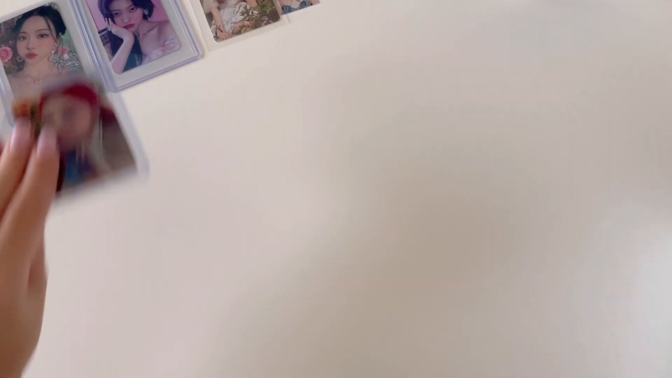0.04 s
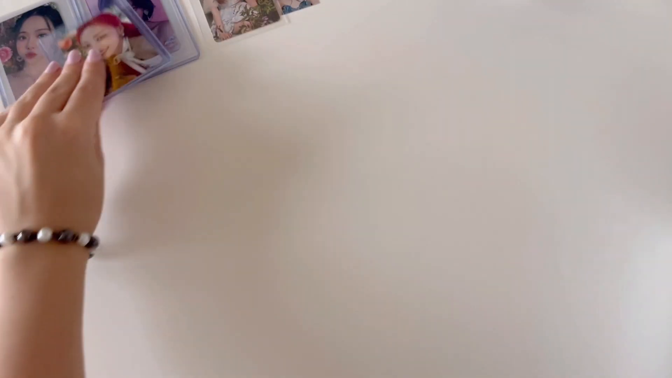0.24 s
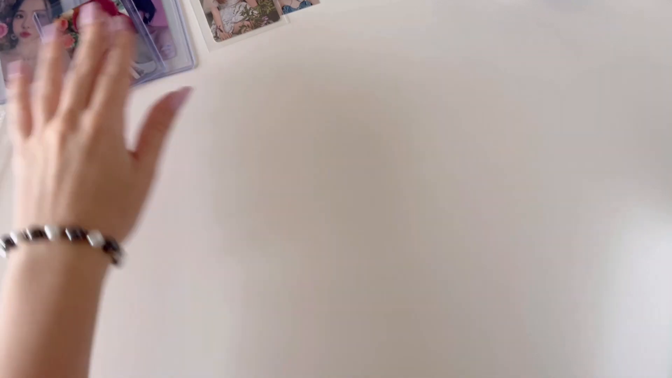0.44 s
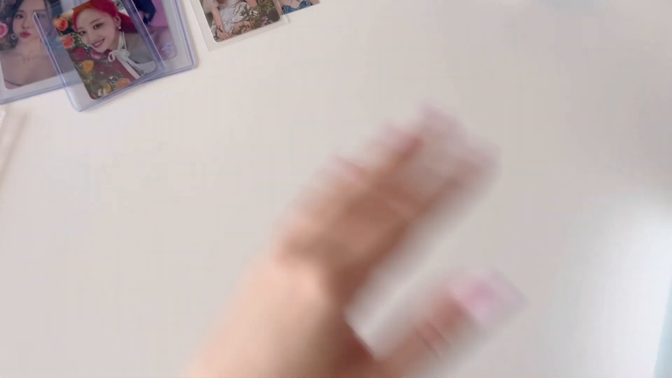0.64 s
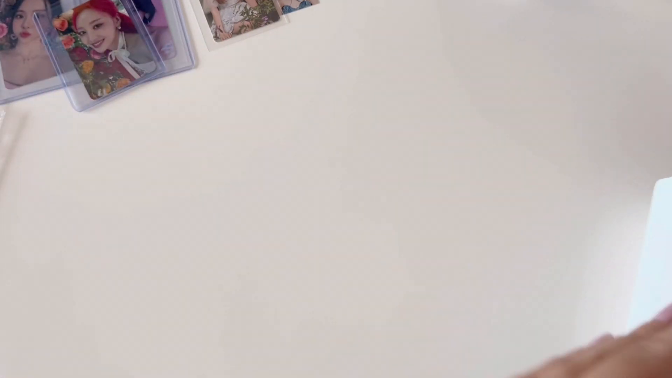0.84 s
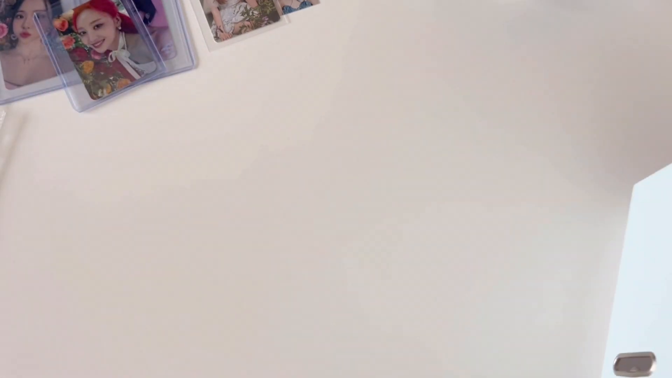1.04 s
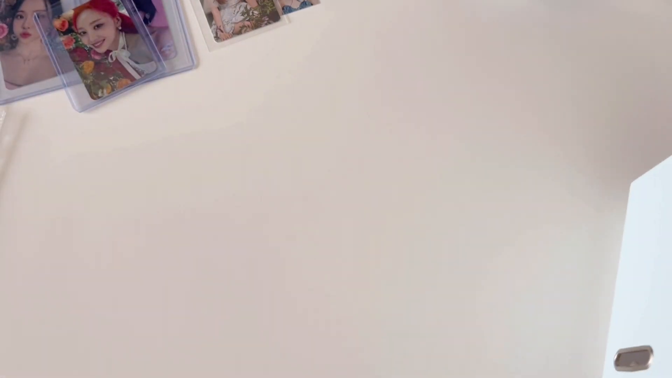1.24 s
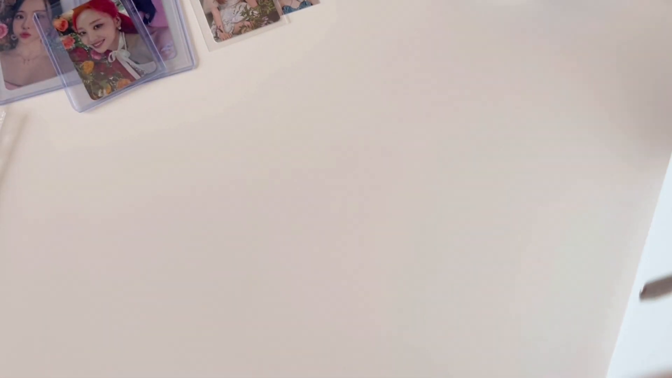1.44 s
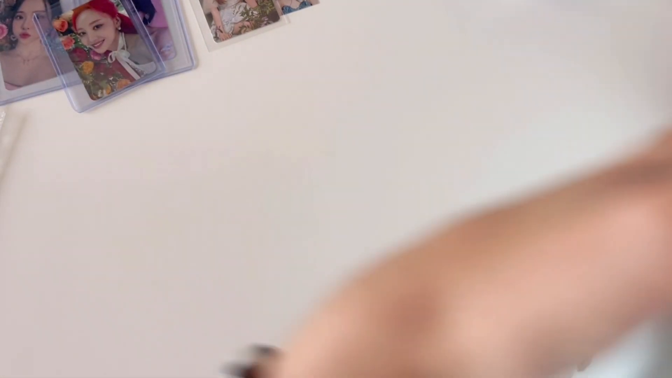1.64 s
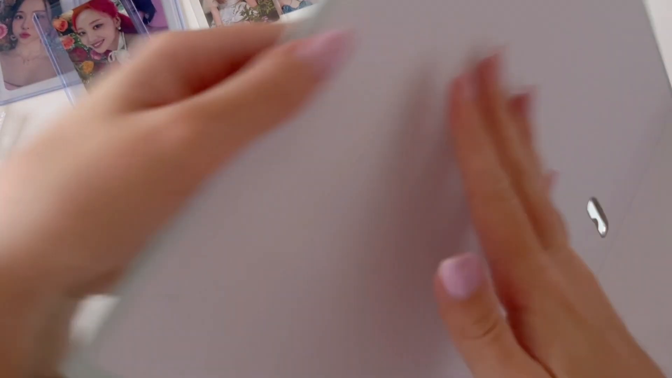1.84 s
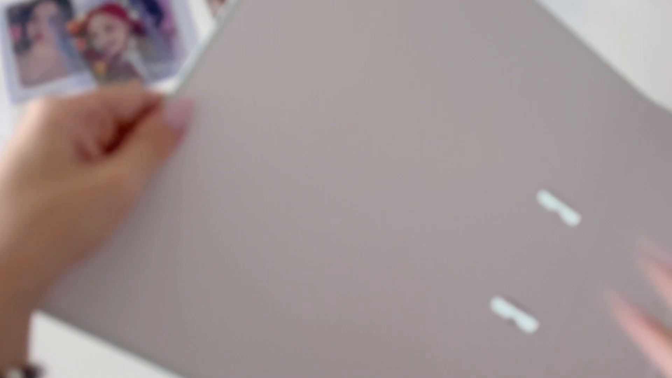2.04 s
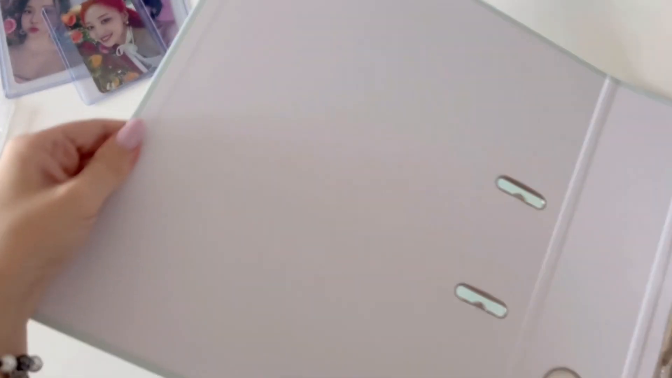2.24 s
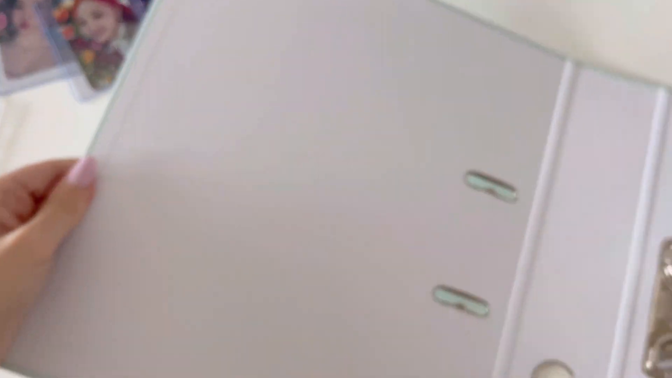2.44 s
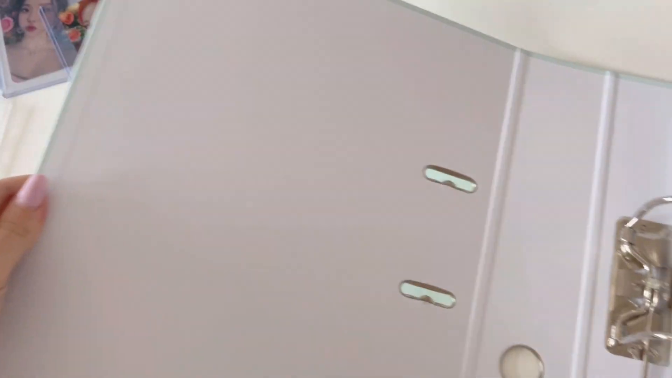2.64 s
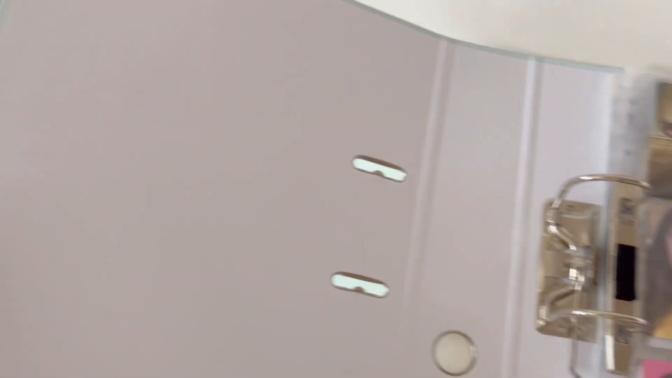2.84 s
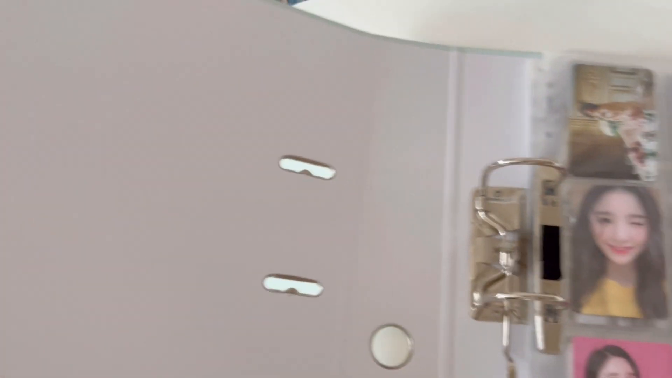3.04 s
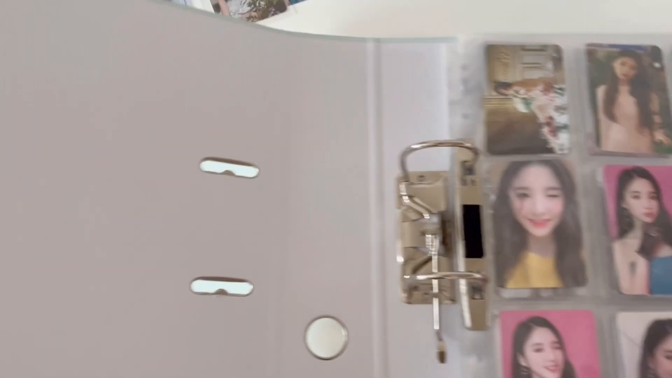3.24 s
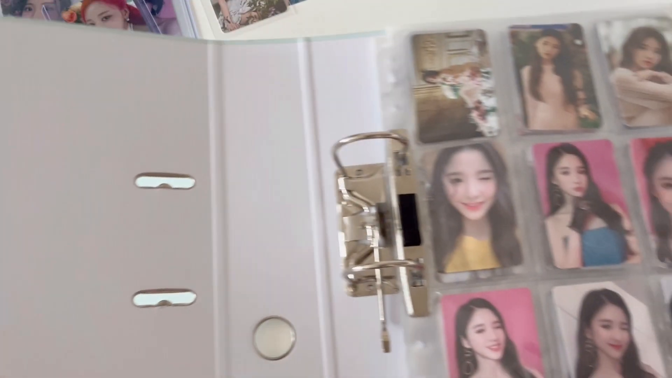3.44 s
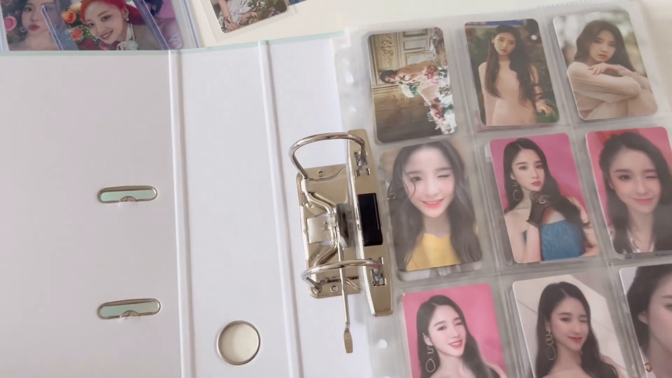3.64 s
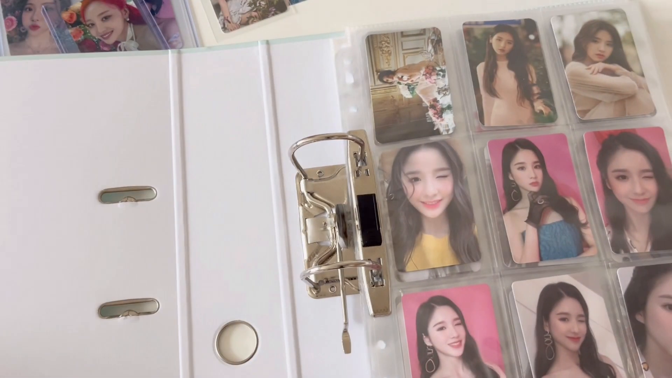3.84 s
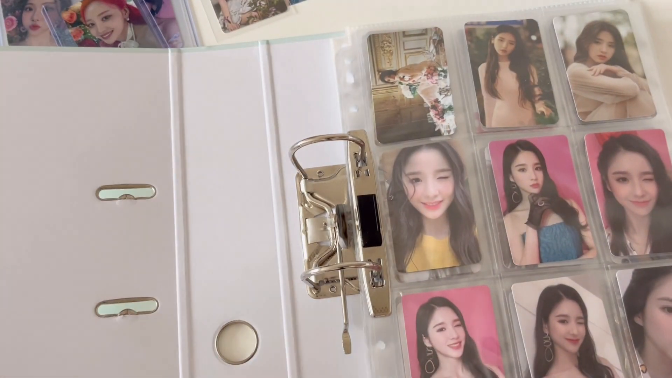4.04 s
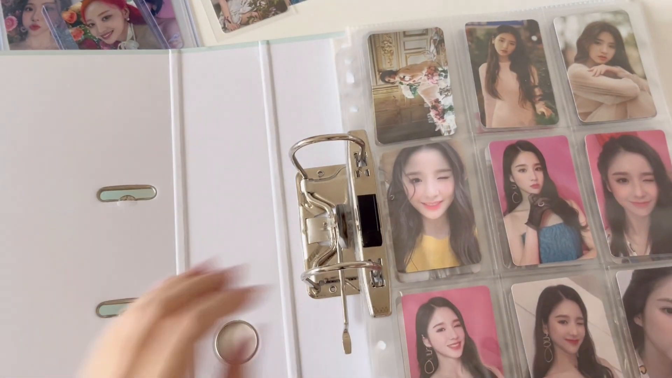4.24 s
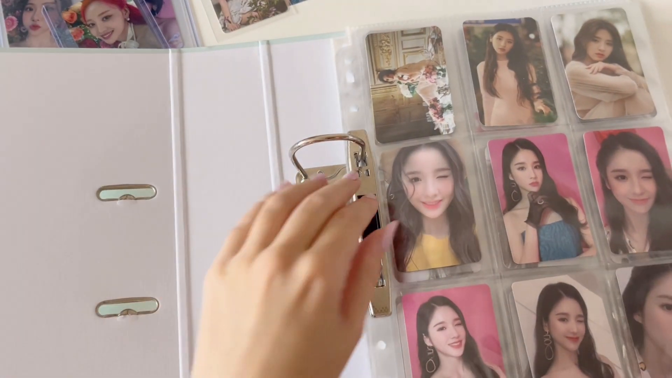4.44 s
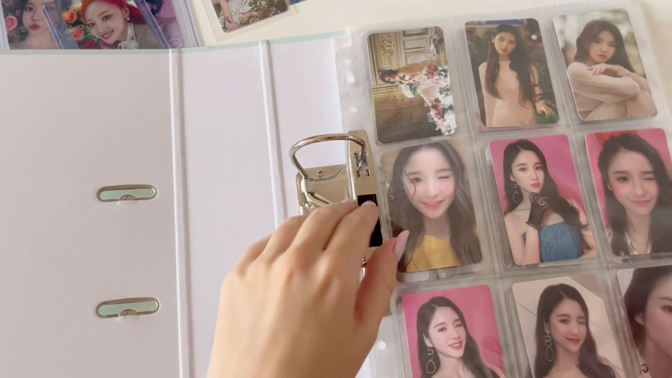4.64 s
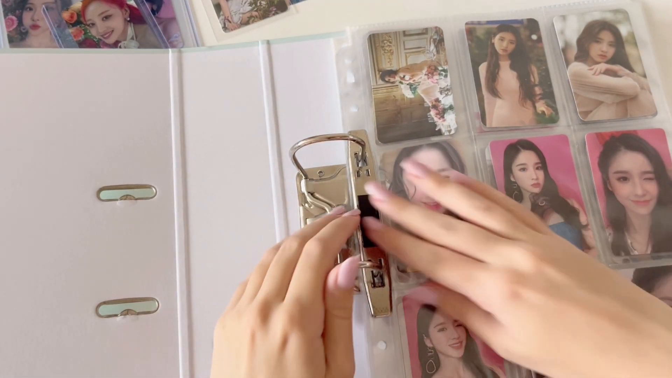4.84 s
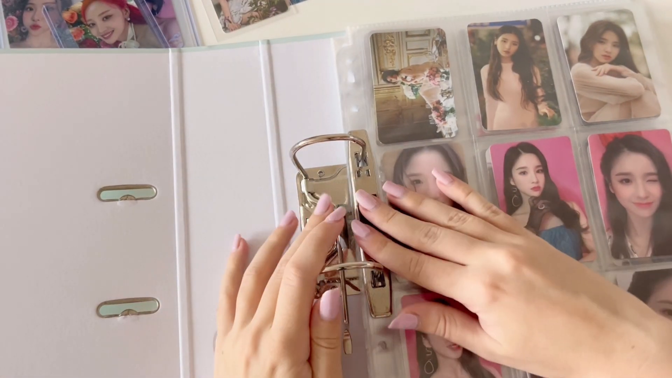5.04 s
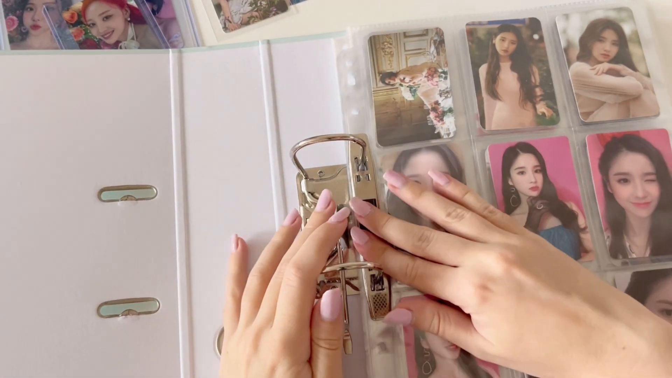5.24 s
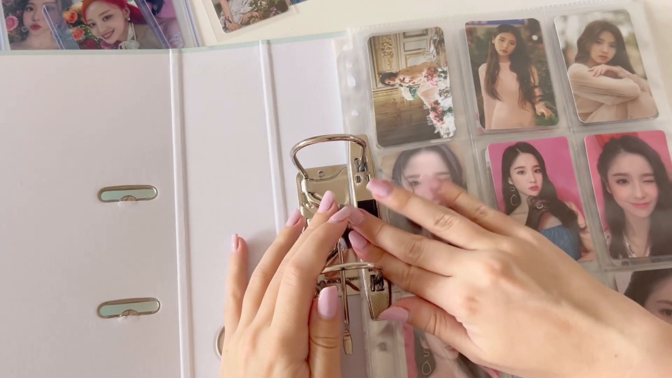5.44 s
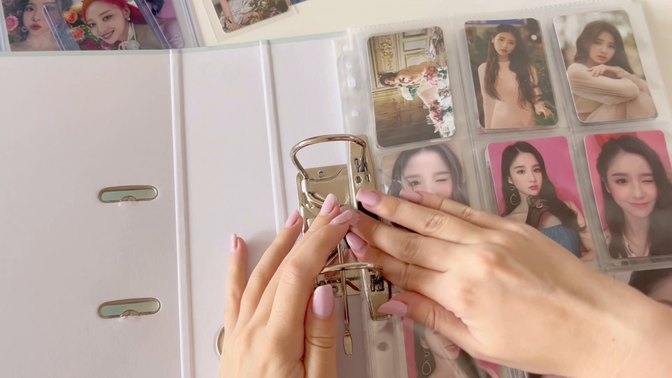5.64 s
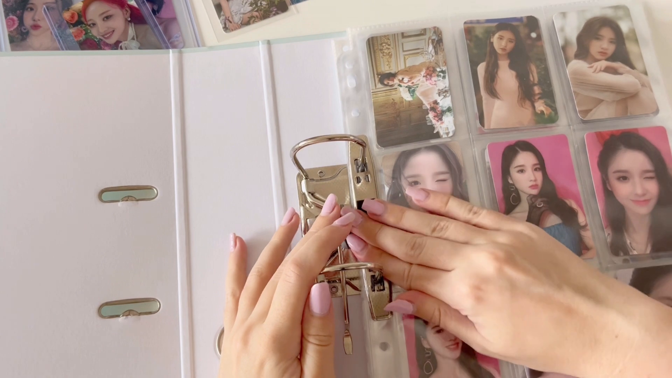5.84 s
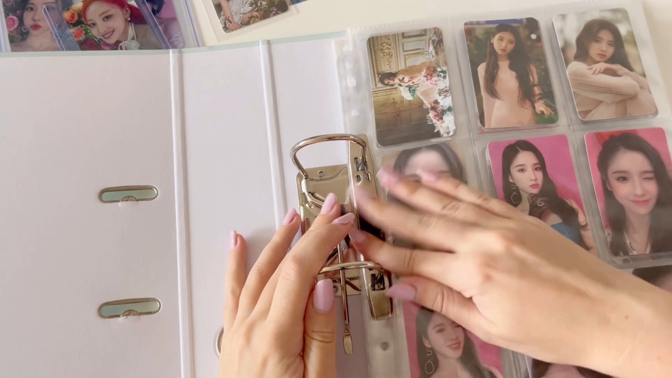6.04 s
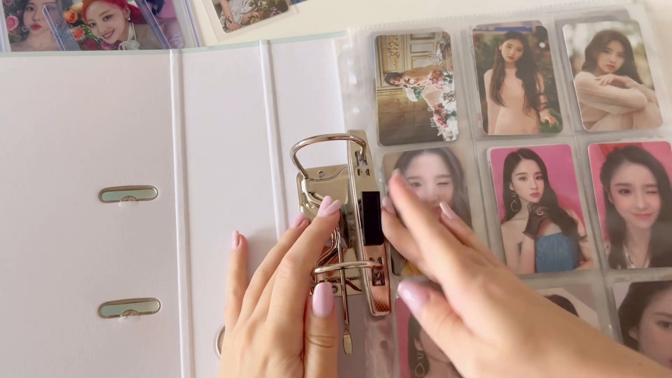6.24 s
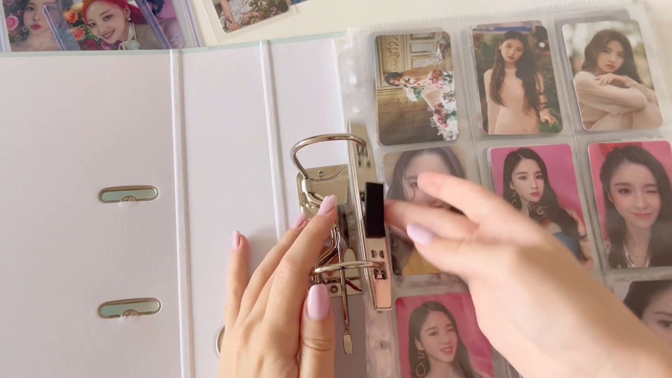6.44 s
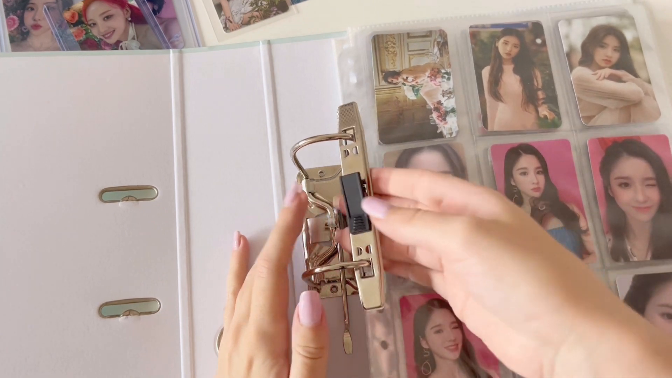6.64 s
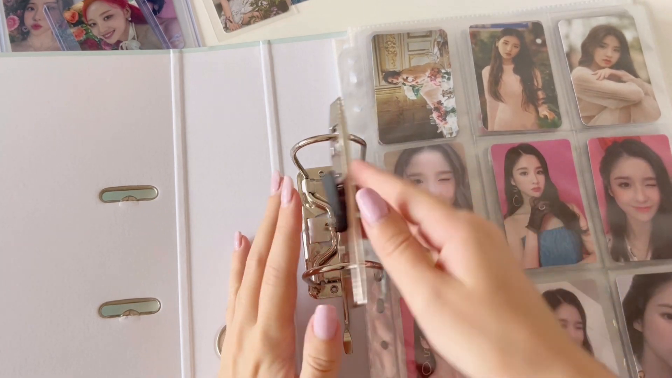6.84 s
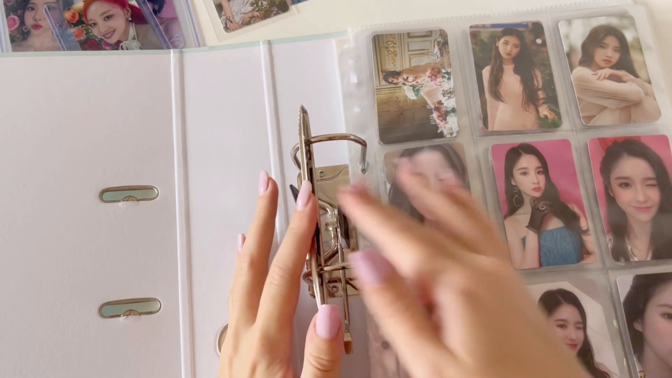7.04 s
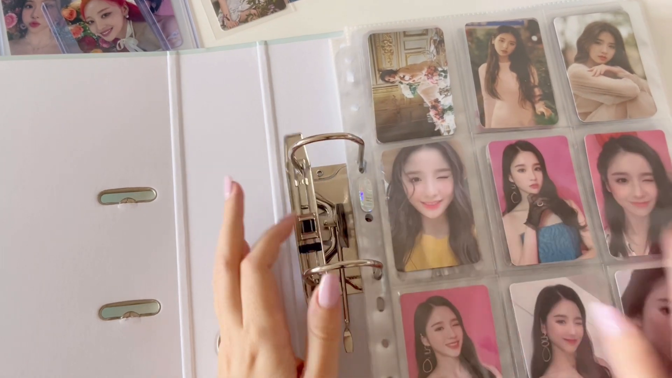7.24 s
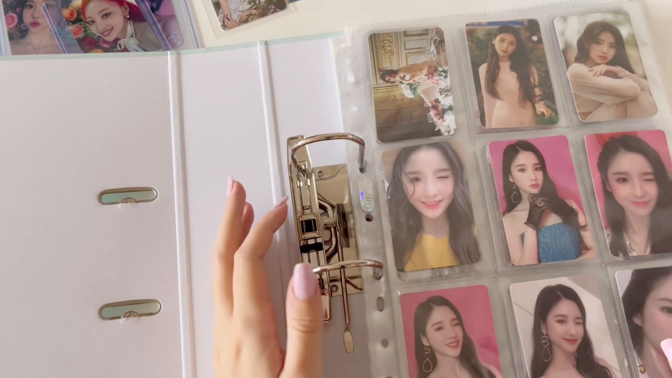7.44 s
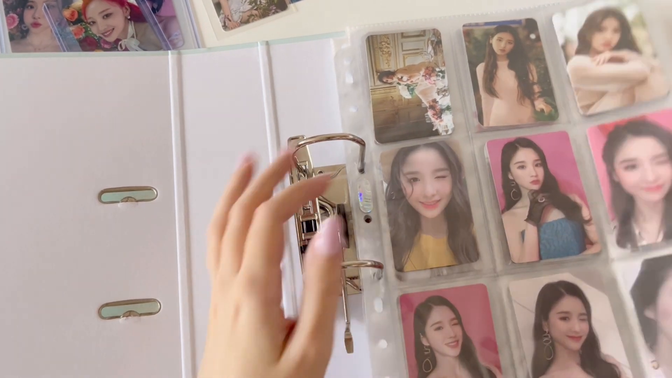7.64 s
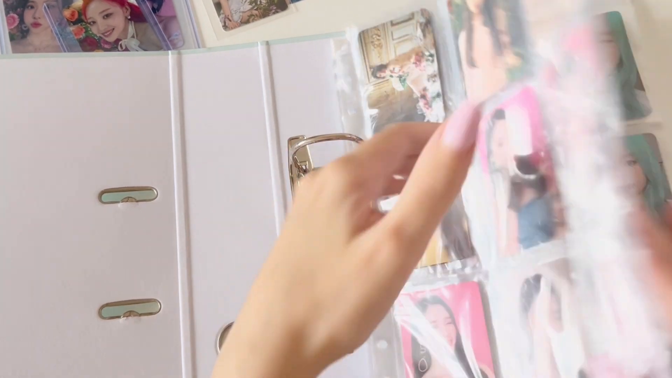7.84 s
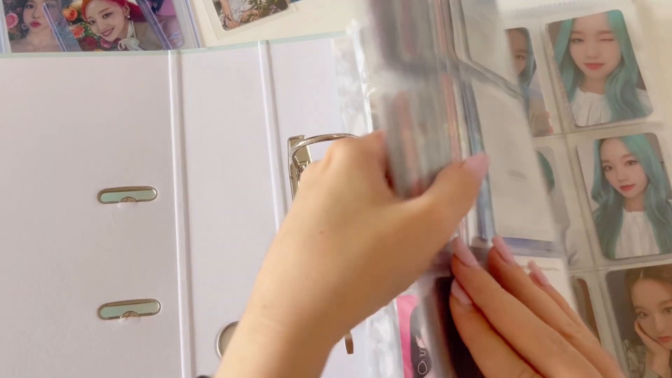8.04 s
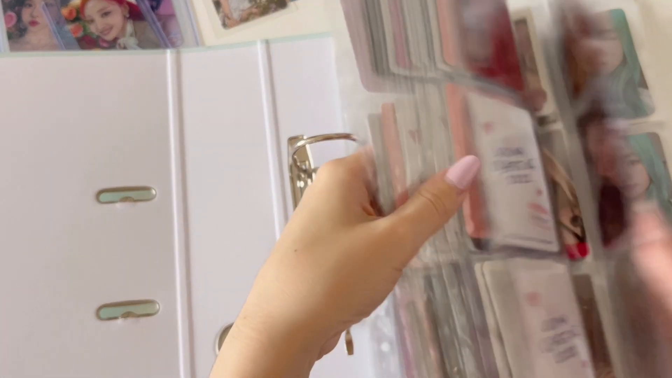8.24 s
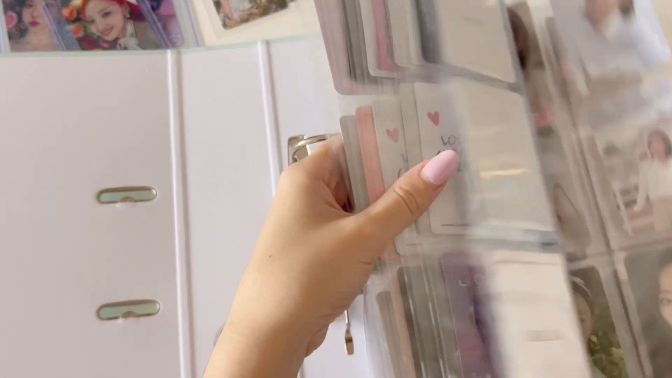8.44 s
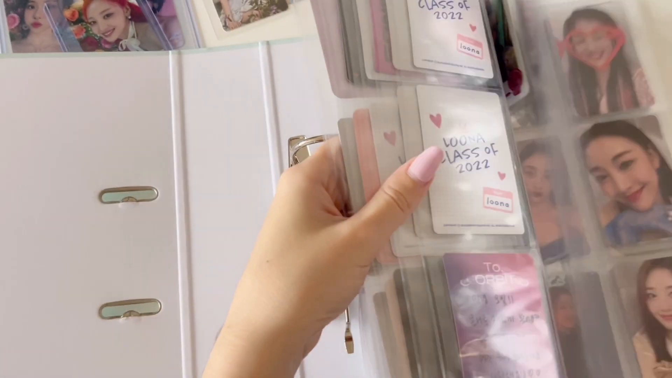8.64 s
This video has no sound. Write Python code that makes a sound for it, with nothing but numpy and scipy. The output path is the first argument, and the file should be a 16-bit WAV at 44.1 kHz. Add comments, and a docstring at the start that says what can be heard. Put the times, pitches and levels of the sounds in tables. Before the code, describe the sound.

A quiet small room with faint steady hush, heard very close in stereo. At 0.2-0.45 s a hard plastic card holder clicks and scuffs on the desk; after a gap, small knocks and rubs at 0.9-1.1 s. From 1.2 s a stiff binder slides, with a low thump at 1.8, a cluster of bright knocks around 2.0, a bump at 2.3 and smooth hissing friction until 3.6, with a deep thud near 3.1. A faint hollow hum lingers to 4.5 in near silence. Fingers brush softly, thin metal clinks at 4.9, and the lever judders at 5.1. At 5.78 a loud, sharp steel snap with a woody thud rattles briefly. From 6.0 to 7.1 metal scrapes and taps; at 7.2 the bar drops in a bouncing clatter, with a bright click at 7.47. From 7.6 to the end plastic sleeves rustle, crinkle and pop, densest around 7.9.

```python
"""Binder and card sleeves at a desk

Hands in a small room put down a card in a hard holder, drag a lever-arch binder over and open it, snap
its steel lever open, lift the clamp bar off the arches, then turn rustling, popping sleeves full of cards.
Blows are noise cracks with ringing modes, rubbing is shaped noise under tiny slips, grating is stick and
slip on modes, and plastic pops are falling bursts; all reach a two-port microphone close by."""
import sys
import numpy as np
from scipy import signal
from scipy.fft import rfft, irfft, next_fast_len
from scipy.io import wavfile
from scipy.ndimage import uniform_filter1d

SR = 44100
rng = np.random.default_rng(int(sys.argv[2]) if len(sys.argv) > 2 else 0)


def master_out(mix):
    """Clip the mix to full scale and print it as 16-bit PCM to the path in sys.argv[1]."""
    frames = np.transpose(np.atleast_2d(mix))
    ceiling = np.clip(frames, -1, 1)
    pcm = np.round(ceiling * 32767).astype(np.int16)
    wavfile.write(sys.argv[1], SR, pcm)


N = 383669
TIME, HZ = np.arange(N) / SR, np.fft.rfftfreq(N, 1 / SR)
AGE = TIME[:SR // 4]  # time since a blow, s

# Event levels are taken before each source's trim; mode levels are relative within their own set.
# Brightness is the treble and weight the bass, each relative to the level of the middle.


def amp(db):
    """Decibels to gain."""
    return 10 ** (np.asarray(db) / 20)


def unit(x):
    """Scales to rms 1."""
    return x / np.sqrt(np.mean(x ** 2) + 1e-20)


def read(points, hz):
    """Reads a table along a log-frequency axis."""
    f, value = np.transpose(points)
    return np.interp(np.log(hz + 1), np.log(f + 1), value)


def add(mix, s, sound):
    """Mixes a sound in at s seconds."""
    part = mix[max(round(s * SR), 0):][:len(sound)]
    part += sound[:len(part)]


def band(x, lo_hz, hi_hz, order=3):
    """Causal band-pass."""
    sos = signal.butter(order, [lo_hz, min(hi_hz, .49 * SR)], "band", fs=SR, output="sos")
    return signal.sosfilt(sos, x)


def at_level(x, db):
    """Sets a short sound's energy to that of db rms held for 20 ms."""
    return amp(db) * x * np.sqrt(SR / 50 / np.sum(x ** 2))


def wander(per_s, size):
    """Smooth random drift, low-passed around per_s, with rms 1."""
    n = next_fast_len(max(size, SR))
    smooth = 1 / (1 + (np.fft.rfftfreq(n, 1 / SR) / per_s) ** 4)
    return unit(irfft(rfft(rng.standard_normal(n)) * smooth, n))[:size]


def coloured(colour):
    """Two independent rows of steady noise in a colour, at rms 1."""
    return unit(irfft(rfft(rng.standard_normal((2, N))) * amp(read(colour, HZ)), N))


def ring(modes, spread):
    """Dying modes; each blow lands elsewhere and so shifts them a little."""
    hz, db, t60 = np.transpose(modes)[:, :, None]
    detune, side = rng.standard_normal((2, len(modes), 1))
    swing = np.sin(2 * np.pi * hz * (1 + spread * detune) * AGE)
    return (np.sign(side) * amp(db - 60 * AGE / t60) * swing).sum(0)


# colour of the still room: f/Hz, level per Hz/dB
STILL_AIR = [(25, 2), (60, 5), (130, -4.5), (300, -8), (700, -16), (1050, -17.5), (1500, -22), (2800, -21),
             (6000, -24.5), (13000, -22.5), (16000, -44)]


def still_air(level_db=-71):
    """The steady hush of the room: coloured noise."""
    return amp(level_db) * coloured(STILL_AIR)


# when the hum hangs in the room, as the slide ends: start t/s, end t/s
HUM_SPAN = (3.63, 4.55)
# its colour: f/Hz, level per Hz/dB
HUM = [(300, -20), (880, -7), (1050, 2), (1230, -9), (1520, -2), (1830, -5.5), (2150, -11.5), (2600, -40),
       (8000, -50)]


def hum(level_db=-73, fade_s=0.076):
    """A faint, hollow hum of coloured noise fades in and out."""
    swell = (np.tanh((TIME - HUM_SPAN[0]) / fade_s) - np.tanh((TIME - HUM_SPAN[1]) / fade_s)) / 2
    return amp(level_db) * swell * coloured(HUM)


def strokes(rows, attack_s, release_t60):
    """Each stroke swells, holds and dies away; gives rows of t/s, rumble/dB, rub/dB, hiss/dB."""
    last_s = max(row[0] + row[1] for row in rows) + .2
    t = TIME[(TIME > rows[0][0] - .05) & (TIME < last_s)][::128]
    power = 1e-12
    for start, length, db, bright_db, weight_db in rows:
        swell = (1 + np.tanh((t - start) / attack_s)) / 2
        fade = amp(-60 * np.maximum(t - start - length, 0) / release_t60)
        gains = amp(db + np.array([weight_db, 0, bright_db]))
        power = power + np.outer(swell * fade, gains) ** 2
    return np.column_stack([t, 10 * np.log10(power)])


def slide(curve):
    """One unbroken slide whose rumble and hiss ride on its level; rows as from strokes."""
    return [(s, db + weight_db, db, db + bright_db) for s, db, bright_db, weight_db in curve]


# where rumble hands over to rub, and rub to hiss: f/Hz
RUB_EDGES = [300, 3000]


def rub(curve, colour, slips_per_s, slip_spread_db, smooth_db, uneven_db, patchy_db,
        rumble_db, rub_db, hiss_db):
    """Friction: tiny slips over a smooth hiss, under wavering pressure; the colour shifts with the contact."""
    s, *levels = np.transpose(curve)
    sizes = amp(slip_spread_db * np.minimum(rng.exponential(1, N), 4))
    sizes = sizes * (rng.random(N) < slips_per_s / SR)
    slips = signal.lfilter([1], [1, -np.exp(-1 / (0.0018 * SR))], sizes)  # 1.8 ms decay constant
    pressure = amp(uneven_db * wander(36, size=N))
    force = unit((unit(slips) + amp(smooth_db)) * pressure)
    start, stop = max(int(s[0] * SR), 0), min(int(s[-1] * SR), N)
    noise = rng.standard_normal((2, stop - start))
    hz, t, z = signal.stft(force[start:stop] * noise, SR, nperseg=512)

    low = 1 / (1 + (hz / RUB_EDGES[0]) ** 6)
    high = 1 - 1 / (1 + (hz / RUB_EDGES[1]) ** 6)
    power = 0
    for share, db, trim_db in zip((low, 1 - low - high, high), levels, (rumble_db, rub_db, hiss_db)):
        shape = unit(np.sqrt(abs(share)) * amp(read(colour, hz)))
        power = power + np.outer(shape, amp(np.interp(s[0] + t, s, db) + trim_db)) ** 2
    patches = uniform_filter1d(rng.standard_normal(power.shape), size=4, axis=0)
    patches = unit(uniform_filter1d(patches, size=9, axis=1))
    shaped = z * np.sqrt(power) * amp(patchy_db * patches)
    sound = signal.istft(shaped, SR, nperseg=512)[1][:, :stop - start]
    faded = sound * signal.windows.tukey(stop - start, .03)
    return np.pad(faded, ((0, 0), (start, N - stop)))


# modes of a dent in a sheet: multiple of its pitch, level/dB
DENT = [(0.699, -2.5), (0.971, 1), (1.25, -0.5)]


def dent(hz, cycles=2.43, ragged_db=-4, crack_db=-13, crack_t60=0.0088, sag=0.33, sag_s=0.0017):
    """A dent in stiff plastic flips: ragged cycles of its modes fall as it slackens, with a tiny crack."""
    push, crack = rng.standard_normal((2, 1500))
    t = AGE[:len(push)]
    ratio, db = np.transpose(DENT)[:, :, None]
    turns = np.cumsum(hz * (1 + sag * (2 * np.exp(-t / sag_s) - 1))) / SR
    modes = (amp(db) * np.sin(2 * np.pi * (ratio * turns + rng.random(ratio.shape)))).sum(0)
    ragged = amp(ragged_db) * unit(band(push, hz * 0.64, hz * 1.46, order=2))
    swing = t * hz / cycles * 2
    sheet = (unit(modes) + ragged) * swing * np.exp(1 - swing)
    return sheet + amp(crack_db) * band(crack, 470, 12000, order=1) * amp(-60 * t / crack_t60)


def crinkle(curve, per_s, hz, spread_db, level_db):
    """Small dents and catches at random, as strong as the rubbing that sets them off."""
    s, _, rub_db, _ = np.transpose(curve)
    span = s[-1] - s[0]
    out = np.zeros(N)
    for place, size, pitch in rng.random((int(per_s * span), 3)):
        when = s[0] + place * span
        db = np.interp(when, s, rub_db) + level_db + spread_db * size ** 2
        add(out, when, at_level(dent(hz * 2 ** (1.9 * (pitch - .5))), db))
    return out


# card holder and cover shoved over the desk: start t/s, length t/s, level/dB, brightness/dB, weight/dB
SHOVES = [(.17, 0.048, -63, -5, 4), (.218, .01, -57, 2, -4), (.236, 0.03, -46, -1.5, -4.5),
          (.29, 0.085, -59.5, 3.5, 6), (.405, 0.059, -56, -2, 4), (.54, 0.031, -57, -12, 3),
          (.58, 0.15, -72, -7, -7), (.875, .05, -59.5, -8.5, 4), (.94, 0.025, -55, -7, 9.5),
          (1.047, 0.03, -50, 8, 2), (1.11, 0.03, -56, -1, 7), (1.172, 0.024, -57, 4.5, 1),
          (2.06, 0.072, -52, -22, 11.5), (3.05, 0.18, -55, -9, 16.5), (3.72, .3, -64.5, -13, 1),
          (3.865, 0.05, -57.5, -8.5, 5)]
# colour of the rubbing pair: f/Hz, level per Hz/dB
HOLDER_ON_DESK = [(30, -7), (75, 19.5), (160, -9), (300, 1.5), (600, -1), (1100, -4.5), (2200, -12),
                  (3400, -12.5), (4600, -16), (5300, -10.5), (6000, -15), (7500, -17.5), (12000, -23.5),
                  (15500, -29)]


def shoves():
    """Card holder and cover rub on the desk in short strokes of slipping friction."""
    curve = strokes(SHOVES, attack_s=0.014, release_t60=0.18)
    return rub(curve, HOLDER_ON_DESK, slips_per_s=900, slip_spread_db=2.7, smooth_db=0, uneven_db=1.3,
               patchy_db=2.3, rumble_db=0.0, rub_db=-2.0, hiss_db=1.5)


# fingers brushing the binder: start t/s, length t/s, level/dB, brightness/dB, weight/dB
FINGERS = [(4.255, 0.047, -77.5, 4, 8), (4.42, 0.064, -67, -6, -2), (4.505, 0.054, -66, 6.5, 7),
           (4.775, 0.39, -69.5, -9, -17), (5.082, 0.025, -52.5, -6.5, 5), (5.14, 0.088, -65, -5, 11),
           (5.24, .08, -75, -16, 4), (5.36, 0.067, -79, -8, 5.5), (5.63, 0.067, -69, -23, 0)]
# colour of the rubbing pair: f/Hz, level per Hz/dB
NAILS_ON_BOARD = [(30, -26.5), (110, 10.5), (200, -15), (400, -0.5), (750, -8), (1200, -7), (1700, -15.5),
                  (3000, -15.5), (8000, -15.5), (15500, -18)]


def fingers():
    """Nails brush the board in uneven friction that sets off small dents; gives rubbing and popping."""
    curve = strokes(FINGERS, attack_s=0.012, release_t60=0.31)
    rubbing = rub(curve, NAILS_ON_BOARD, slips_per_s=1500, slip_spread_db=1.5, smooth_db=2, uneven_db=4.8,
                  patchy_db=2.5, rumble_db=1.5, rub_db=1.0, hiss_db=-0.5)
    return rubbing, crinkle(curve, per_s=31, hz=1020, spread_db=8.0, level_db=-19.5)


# the binder's long slide over the desk: t/s, level/dB, brightness/dB, weight/dB
BINDER_DRAG = [(1.19, -67, -6, -3), (1.28, -58.5, -5, -2), (1.37, -52, 0, -5), (1.54, -54.5, -4, -8),
               (1.63, -65, 4, -9), (1.9, -62, 7.5, -5), (2.03, -52, -13, -3), (2.24, -52, -2.5, -15),
               (2.55, -49.5, -4.5, -6), (2.72, -50, 4, -3), (2.88, -52, 4.5, -1.5), (3.3, -53, 6, -10),
               (3.47, -52, 4, -12), (3.57, -51, -2.5, -11), (3.65, -60.5, -7, -8), (3.75, -82, 2, -7)]
# colour of the rubbing pair: f/Hz, level per Hz/dB
BOARD_ON_DESK = [(30, 11), (75, 29), (160, 3), (300, -10), (600, -13), (1100, -16.5), (2200, -13.5),
                 (3400, -12.5), (6000, -12), (12000, -15), (15500, -20)]


def binder_drag():
    """The board slides in mostly smooth friction, with small dents; gives rubbing and popping."""
    curve = slide(BINDER_DRAG)
    rubbing = rub(curve, BOARD_ON_DESK, slips_per_s=700, slip_spread_db=2.4, smooth_db=10.3, uneven_db=0.67,
                  patchy_db=2.0, rumble_db=0.0, rub_db=0.5, hiss_db=1.0)
    return rubbing, crinkle(curve, per_s=41, hz=1240, spread_db=2.5, level_db=-17.0)


# the clamp bar scraping along the arches: start t/s, length t/s, level/dB, brightness/dB, weight/dB
BAR_SCRAPE = [(5.99, 0.11, -58, -6, 5), (6.15, 0.054, -58, -3, 1), (6.312, 0.021, -51.5, -6.5, -1),
              (6.415, 0.035, -59, 0, 1), (6.455, 0.045, -48, 3, -7), (6.5, 0.024, -41.5, -1, -6),
              (6.57, 0.022, -56, -15, -5), (6.675, 0.053, -58.5, -13, 6.5), (6.83, 0.13, -62.5, -1, 7),
              (6.96, 0.081, -62, -6, 9), (7.105, 0.038, -50.5, -16, 3.5), (7.148, 0.1, -49, 9.5, -5),
              (7.22, 0.089, -46.5, 1, -6), (7.415, 0.065, -63, -5, 1.5), (7.495, 0.075, -73, -12, 16)]
# colour of the rubbing pair: f/Hz, level per Hz/dB
STEEL_ON_STEEL = [(30, -18), (80, 10.5), (240, -0.5), (500, 3.5), (1000, 1.5), (1900, -1.5), (2700, -2.5),
                  (3400, 1), (4500, -5.5), (9000, -3), (13000, 1), (15500, -7)]


def bar_scrape():
    """Steel rubs steel in coarse slips, with a few small catches; gives rubbing and popping."""
    curve = strokes(BAR_SCRAPE, attack_s=0.016, release_t60=0.28)
    rubbing = rub(curve, STEEL_ON_STEEL, slips_per_s=1300, slip_spread_db=3.9, smooth_db=0, uneven_db=2.9,
                  patchy_db=3, rumble_db=-1.5, rub_db=1.0, hiss_db=-1.0)
    return rubbing, crinkle(curve, per_s=14, hz=1900, spread_db=15.0, level_db=-29.0)


# sleeves sliding over one another: start t/s, length t/s, level/dB, brightness/dB, weight/dB
SLEEVES = [(7.62, 1.02, -66.5, -13, -0.5), (7.735, 0.026, -53, -8, -11), (7.838, 0.008, -52, -9, -6),
           (7.882, 0.074, -50.5, 2, -8), (7.99, 0.11, -63.5, 3, 2), (8.143, 0.01, -52.5, -5, -6),
           (8.222, 0.0085, -54.5, -0.5, -18), (8.27, 0.025, -60, 3, -12), (8.41, 0.039, -58.5, 0, -7),
           (8.548, 0.011, -47, -2.5, -20), (8.62, 0.08, -81.5, -15, 25)]
# colour of the rubbing pair: f/Hz, level per Hz/dB
FILM_ON_FILM = [(30, 0), (70, 4), (150, -9), (300, -3), (700, 6.5), (1400, -1), (2500, -2), (4000, -4.5),
                (6000, -4.5), (8500, -10.5), (15500, -14.5)]


def sleeves():
    """Film slips over film and flexes into a crowd of small dents; gives rubbing and popping."""
    curve = strokes(SLEEVES, attack_s=0.016, release_t60=0.097)
    rubbing = rub(curve, FILM_ON_FILM, slips_per_s=750, slip_spread_db=4.3, smooth_db=-4, uneven_db=1.8,
                  patchy_db=2.5, rumble_db=-1, rub_db=1.0, hiss_db=2.0)
    popping = crinkle(curve, per_s=130, hz=2400, spread_db=15.0, level_db=-17.0)
    popping += crinkle(curve, per_s=30, hz=1100, spread_db=10, level_db=-14)  # broad, slow flexing
    return rubbing, popping


# plastic buckling: t/s, level/dB, pitch f/Hz
POPS = [(.881, -58, 940), (0.9391, -49.5, 1370), (1.784, -58, 1520), (1.982, -44.5, 1290),
        (4.788, -74, 1390), (5.004, -53.5, 1670), (5.01, -57, 1350), (5.03, -63.5, 1550), (5.08, -49, 1370),
        (5.261, -62, 1790), (5.358, -56, 1350), (5.607, -51, 1530), (5.711, -59.5, 1280),
        (5.9935, -47, 1584), (6.016, -54, 1240), (6.03, -46.5, 1670), (6.192, -54, 1617),
        (6.962, -53, 1650), (7.292, -46, 1290), (7.401, -52, 1900), (7.416, -55.5, 1500),
        (7.4698, -32, 1784), (7.613, -54, 1640), (7.656, -52, 1400), (7.675, -52, 1850),
        (7.705, -51.5, 1750), (7.755, -50.5, 1720), (7.76, -53, 1320), (7.801, -46.5, 1780),
        (7.833, -44.5, 1250), (7.84, -55, 1600), (7.86, -60, 1360), (7.888, -50, 1490), (7.919, -50, 1880),
        (7.746, -56, 1650), (7.811, -62, 1500), (7.869, -58, 1550), (7.904, -51, 2500),
        (7.938, -50.5, 2100), (7.96, -53, 1150), (7.966, -54, 1900), (8.021, -59, 1400), (8.071, -60, 1100),
        (8.118, -59, 1550), (8.126, -60, 1740), (8.142, -52.5, 1600), (8.201, -61, 1500),
        (8.298, -57.5, 1310), (8.467, -59.5, 1550), (8.524, -62, 3000), (8.222, -54, 1020),
        (8.234, -54, 1040), (8.268, -46.5, 1220), (8.334, -55, 1170), (8.356, -59.5, 1380),
        (8.394, -64, 1100), (8.417, -57, 1110), (8.451, -59, 1310), (8.513, -57.5, 1360),
        (8.558, -54.5, 1200), (8.589, -53, 1410), (8.597, -54, 1310), (8.636, -44.5, 1310),
        (8.642, -46, 1340), (8.676, -53, 1200), (8.686, -61, 850)]


def pops(level_db=-2):
    """The placed pops: single dents of plastic flipping over."""
    out = np.zeros(N)
    for s, db, hz in POPS:
        add(out, s, at_level(dent(hz), db + level_db))
    return out


# heavy thuds: the cover and the desk bumping, and the lever and clamp bar landing: t/s, level/dB, pitch f/Hz,
# ring length/cycles
BUMPS = [(.55, -53, 330, 9), (.922, -50, 430, 5), (0.952, -43, 120, 10), (1.336, -46.5, 62, 9),
         (1.834, -36.5, 77, 8.3), (2.082, -36.5, 62, 9), (2.103, -40, 270, 9), (2.3116, -40, 554, 9.8),
         (2.3136, -34.5, 310, 6.2), (2.317, -31.5, 160, 7.3), (2.525, -46.5, 250, 9.8),
         (3.047, -38.5, 70.4, 8.2), (3.092, -29.5, 78, 9), (3.12, -37, 60, 9), (3.199, -40, 309, 9.6),
         (4.414, -45, 90, 7.7), (4.886, -43.5, 85, 9), (5.114, -37.5, 124, 5), (5.781, -27, 520, 8),
         (5.784, -34.5, 86, 9), (5.7906, -24, 232, 5), (6.504, -37.5, 258, 11), (6.609, -47.5, 250, 8),
         (6.681, -46, 300, 10), (6.718, -49, 220, 7.9), (6.99, -49, 230, 10), (7.199, -28.5, 247, 14),
         (7.207, -26.5, 121, 5.9), (7.22, -28, 83, 12), (7.256, -37, 280, 8), (7.665, -48, 200, 5)]


def bumps(rise_cycles=0.83, level_db=-3):
    """Soft, heavy contacts: a low board swing with a weak overtone, cut short where a hand damps it."""
    out = np.zeros(N)
    for s, db, hz, cycles in BUMPS:
        swing = ring([(hz, 0, cycles / hz), (hz * 1.65, -9, .5 * cycles / hz)], 0.01)
        add(out, s, at_level(swing * (1 - np.exp(-AGE * hz / rise_cycles)), db + level_db))
    return out


def judder(rows, modes, slips_per_s, spread_db, attack_s, release_t60, shift, uneven_db):
    """Stick and slip: uneven catches ring one set of modes, shifted a little at each of four spots."""
    out = np.zeros(N)
    for start, length, db in rows:
        t = TIME[:int((length + .3) * SR)]
        rate = slips_per_s * amp(4 * wander(150, size=len(t)))
        catches = np.diff(np.floor(np.cumsum(rate) / SR), prepend=-1)
        sizes = catches * rng.choice([-1, 1], len(t)) * amp(spread_db * rng.uniform(-0.7, 1, len(t)))
        release_db = -60 * np.maximum(t - length, 0) / release_t60
        pressure = (1 - np.exp(-t / attack_s)) * amp(uneven_db * wander(45, size=len(t)) + release_db)
        spot = rng.integers(0, 4, len(t))
        sound = sum(signal.fftconvolve(sizes * pressure * (spot == k), ring(modes, shift)) for k in range(4))
        add(out, start, amp(db) * sound * np.sqrt(length * SR / np.sum(sound ** 2)))
    return out


# the cover's edge catching as it slides: start t/s, length t/s, level/dB
COVER_CATCHES = [(1.36, .03, -54), (2.5, 0.03, -57), (2.6, 0.07, -52), (2.7, 0.66, -59.5),
                 (3.44, 0.0063, -48.5), (3.52, 0.13, -53)]
# the cover's modes: f/Hz, level/dB, t60/s
COVER = [(703, -4, 0.028), (1207, -4, .03), (1640, 0, 0.026), (1920, 2, .022), (2240, -4, .02),
         (3250, 1.5, 0.016), (5000, -2.5, .01)]


def cover_catches():
    """The cover's edge sticks and slips, ringing its short modes."""
    return judder(COVER_CATCHES, COVER, slips_per_s=420, spread_db=8.5, attack_s=.012, release_t60=0.15,
                  shift=.022, uneven_db=2.5)


# the clamp bar's holes grating along the arches: start t/s, length t/s, level/dB
BAR_GRATE = [(6.82, 0.09, -50.5), (7.11, 0.09, -58)]
# the bar's modes while the fingers damp it: f/Hz, level/dB, t60/s
BAR = [(400, -4, 0.025), (900, -4, 0.021), (1650, 1, 0.022), (1850, -2, .016), (2100, -3, 0.014),
       (2650, -6, .01), (3270, -4, 0.016)]


def bar_grate():
    """The hole edges stick and slip quickly, ringing the damped bar."""
    return judder(BAR_GRATE, BAR, slips_per_s=850, spread_db=10, attack_s=0.012, release_t60=0.14,
                  shift=0.031, uneven_db=1.5)


# the sprung lever juddering under the fingers: start t/s, length t/s, level/dB
LEVER_JUDDER = [(5.085, 0.0747, -45.5), (5.15, 0.05, -49.5), (5.22, 0.22, -66)]
# what it shakes: f/Hz, level/dB, t60/s
LEVER_BASE = [(124, 2.5, 0.1), (250, -5.5, 0.079), (310, -3.5, 0.05), (397, -2, .07), (438, -7, 0.041),
              (990, -7.5, 0.051), (1160, -4, 0.043), (1214, -7, 0.038), (1670, -16, 0.018),
              (2200, -16, 0.022)]


def lever_judder():
    """The lever sticks and slips slowly, shaking the low modes of its base."""
    return judder(LEVER_JUDDER, LEVER_BASE, slips_per_s=160, spread_db=8.5, attack_s=0.0028, release_t60=.12,
                  shift=0.048, uneven_db=2.5)


# edges between thud, body, clack and tick: f/Hz
BLOW_EDGES = [45, 300, 1200, 5000, 17000]
# the board under every blow: f/Hz, level/dB, t60/s
BOARD = [(83, -6, .14), (135, -1, .11), (180, -2, .07), (248, 3, .08), (296, 1, .06), (388, -2, .06),
         (428, -2, .06), (494, -5, .045), (526, -3, .05), (670, -4, .04), (760, -2, .04), (829, -1, .04),
         (1000, -1, .035), (1220, -1, .03)]
# bright, light blows tip their middle from body towards clack
MID_TILT, WEIGHT_TILT, USUAL_WEIGHT_DB = 0.23, 0.35, -5
RING_INTO_ROOM = .25  # share of the modes' ring in the scattered path


def blows(rows, modes, crack_t60, ring_db, board_db, chatter_db, chatter_t60, level_db,
          rise_s=0.00016, scatter_t60=0.036, detune=0.0336):
    """A crack, brief chatter, the object's modes and the board under it; hard is bright, heavy thuds.

    Row 0 goes straight to the microphone; row 1 is smeared between the covers on its way into the room."""
    out = np.zeros((2, N))
    for s, blow_db, bright_db, weight_db in rows:
        tip_db = MID_TILT * bright_db - WEIGHT_TILT * (weight_db - USUAL_WEIGHT_DB)
        bands_db = blow_db + np.array([weight_db, -tip_db, tip_db, bright_db])  # thud, body, clack, tick
        slow_start = 1 - np.exp(-AGE / 0.0043)  # the board is heavy
        board = amp(board_db) * ring(BOARD, 0.011) * slow_start
        ringing = amp(ring_db) * ring(modes, detune)
        for path, t60, ring_share in zip(out, (crack_t60, scatter_t60), (1, RING_INTO_ROOM)):
            fade = amp(-60 * AGE / t60) + amp(chatter_db - 60 * AGE / chatter_t60)
            contact = rng.standard_normal(len(AGE)) * fade
            blow = (contact + ring_share * ringing) * (1 - np.exp(-AGE / rise_s)) + board
            for lo, hi, db in zip(BLOW_EDGES, BLOW_EDGES[1:], bands_db):
                add(path, s, at_level(band(blow, lo, hi), db + level_db))
    return out


# card holder, cover, cards and fingernails knocking, after a faint tick at the very start: t/s, level/dB,
# brightness/dB, weight/dB
KNOCKS = [(.016, -86, 27, 7), (.165, -51, -6, -6), (.227, -37.5, 0, -30), (.309, -50.5, -20, -14),
          (.334, -38.5, -1, -8.5), (.407, -50.5, -8, -7), (.439, -52, -27, -16), (.452, -77, 2, -9),
          (.783, -83, 23, -13), (.92, -61, -14, 5), (.939, -46, -22, -7), (.946, -45, -18, -8),
          (.954, -49, -12, -4), (.977, -50, -4, -10), (.997, -45.5, 7.5, -6), (1.032, -49, 5, -9),
          (1.048, -42.5, 0, -14.5), (1.075, -56.5, 13, -6), (1.364, -54, -22, -1), (1.378, -52, -46, -10),
          (1.825, -49.5, -17, -6), (1.992, -51, 20, 7.5), (2.007, -38.5, 0, -17), (2.025, -38.5, 6.5, -1),
          (2.039, -50, 6, 6), (2.055, -35.5, 5.5, -2), (2.311, -57, -12, 0), (2.404, -40.5, -5.5, -20.5),
          (3.682, -57.5, -1, -23), (3.789, -57.5, -6, 2), (4.27, -77.5, 16, -12), (4.41, -63.5, 2, 8.5),
          (4.509, -57.5, -7, 1), (4.552, -55.5, -3, 0), (5.078, -54, -6, 3), (5.316, -83, 17, -12),
          (7.615, -53.5, 0, -13), (7.695, -66, 13, -10), (7.733, -57.5, 6, -8), (7.757, -52.5, -6, -25),
          (7.88, -56, 5, -14), (7.889, -43, -3.5, -9), (8.083, -60, 10, -13), (8.312, -70, 11, -6),
          (8.636, -65, -1, -12)]
# the hard holder's modes: f/Hz, level/dB, t60/s
HOLDER = [(3570, -2, 0.0035), (5230, -8, 0.02), (8600, -22, .012)]


def knocks():
    """Short, dry cracks with the holder's brief ring."""
    return blows(KNOCKS, HOLDER, crack_t60=0.0093, ring_db=-3.5, board_db=-15.0, chatter_db=-11.5,
                 chatter_t60=0.061, level_db=-4.0)


# light touches that leave an arch ringing: t/s, level/dB, brightness/dB, weight/dB
CLINKS = [(4.882, -46, 8, -18.5), (4.912, -53, 13.5, -16)]
# the arch's modes: f/Hz, level/dB, t60/s
ARCH = [(2400, -5, .1), (2686, -9, .1), (3650, -3, .13), (3900, -6, .11), (4487, -1, .14), (4554, -2, .15),
        (4626, -2, .2), (4845, -3, .12), (5103, -3, .11), (5280, -5, .1), (5470, -6, .1), (7456, -8, .08),
        (9179, -5, .11), (12500, -10, .06)]


def clinks():
    """Light contacts with a long chatter excite the arch's slowly dying modes."""
    return blows(CLINKS, ARCH, crack_t60=0.02, ring_db=-9, board_db=-22.0, chatter_db=-8.5,
                 chatter_t60=0.15, level_db=-2.0, rise_s=0.0004, detune=0.0029)


# the loose clamp bar knocking against the arches: t/s, level/dB, brightness/dB, weight/dB
BAR_TAPS = [(6.086, -29, 1, -9.5), (6.178, -52, 9.5, 4.5), (6.33, -48, 1, 2.5), (6.489, -46, 12, 5),
            (6.5, -39.5, 7, 0.5), (6.529, -43, 14, 3), (6.551, -51, 11, -6), (6.597, -38.5, -3, -8),
            (6.71, -41, -15, -17), (6.828, -59, -9, -4), (6.87, -55.5, 0.5, 2), (6.961, -49.5, -14, -8),
            (7.101, -51.5, -2, -7)]
# the loose bar's modes: f/Hz, level/dB, t60/s
BAR_RING = [(960, -3, .025), (1350, -3, .02), (1790, 2, .025), (2020, -1, .025), (2600, -5, .015),
            (3300, 9, .025), (3440, 6, .022), (5200, -5, .008), (8400, 1, .012), (9160, 1, .014),
            (12100, 1, .01)]


def bar_taps():
    """Steel taps ring the loose bar over a strong answer from the board."""
    return blows(BAR_TAPS, BAR_RING, crack_t60=0.026, ring_db=-5.5, board_db=-7.5, chatter_db=-21,
                 chatter_t60=0.058, level_db=-4.5, detune=0.0069)


# the clamp bar dropping onto the base plate and bouncing: t/s, level/dB, brightness/dB, weight/dB
BAR_DROPS = [(7.187, -53, 11, -5.5), (7.1965, -26, 6.5, -11), (7.203, -36, 15.5, 1), (7.2115, -25, 7, -5),
             (7.2165, -34, 6, 1), (7.244, -36.5, 8, 2), (7.251, -43.5, 11, 1), (7.2595, -40.5, 16.5, 4),
             (7.271, -51, 11, 4), (7.289, -37.5, 7, -3.5), (7.309, -41.5, 9, -1), (7.322, -47.5, 8.5, 0)]
# the plate's modes: f/Hz, level/dB, t60/s
BASE_PLATE = [(760, 0, .07), (830, 2, .06), (905, -1, .05), (1130, -3, .04), (1285, -1, .045),
              (1680, -2, .03), (3400, 11, .016), (3650, 6, .014), (4500, 4, .012), (8400, 4, .02),
              (9160, 4, .03), (12100, 3, .025), (13200, 3, .012)]


def bar_drops():
    """A run of bounces, each cracking and ringing the steel plate."""
    return blows(BAR_DROPS, BASE_PLATE, crack_t60=0.029, ring_db=-12.5, board_db=-14, chatter_db=-18,
                 chatter_t60=0.072, level_db=-5.5, rise_s=0.00041, detune=0.01)


# sharp steel snaps: the lever released, then a light tick as the bar is set down on plastic:
# t/s, level/dB, brightness/dB, weight/dB
STEEL_SNAPS = [(5.7792, -19.5, 3.5, -10.5), (7.4698, -54.5, 22, -3)]
# the steel's modes, also rung by the rattle below: f/Hz, level/dB, t60/s
STEEL = [(1150, -5, .014), (1550, -5, .011), (2150, 0, .022), (3350, 6, .016), (3680, 5, .018),
         (4150, -3, .05), (4550, 5, .016), (5450, 8, .014), (7600, 5, .009), (8500, 0, .01), (9400, 4, .01),
         (10600, 5, .007), (11900, 8, .006), (14200, 1, .006)]


def steel_snaps():
    """Each snap is a noise crack with the steel's bright modes."""
    return blows(STEEL_SNAPS, STEEL, crack_t60=0.016, ring_db=-7, board_db=-11, chatter_db=-21.0,
                 chatter_t60=0.07, level_db=-5.0, detune=0.008)


# the lever's linkage rattling after its release: start t/s, length t/s, level/dB
LEVER_RATTLE = [(5.794, .02, -38)]


def lever_rattle():
    """Quick catches in the linkage ring the same steel."""
    return judder(LEVER_RATTLE, STEEL, slips_per_s=900, spread_db=7, attack_s=.003, release_t60=0.15,
                  shift=0.044, uneven_db=2.0)


# how long the room rings: f/Hz, t60/s
ROOM_T60 = [(80, .36), (300, .27), (1000, .26), (4000, .29), (9000, .28), (15000, .25)]
# how strongly: f/Hz, level/dB
ROOM_DB = [(80, -5.5), (300, -7), (1000, -10.5), (3500, -10), (8000, -10), (15000, -16)]


def room(x, first_s=0.0021, early_db=0, early_s=0.015):
    """Dense reflections, strongest from the nearby desk and wall, each band dying at its own speed."""
    t = TIME[:SR * 2 // 3]
    taps = rng.standard_normal((2, len(t))) * (rng.random((2, len(t))) < .15)
    early = 1 + amp(early_db) * np.exp(-t / early_s)
    hz, age, z = signal.stft(taps * early, SR, nperseg=256)
    z = z * amp(-60 * age / read(ROOM_T60, hz)[:, None])
    tail = signal.istft(z, SR, nperseg=256)[1][:, :len(t)] * (t > first_s)
    tail /= np.linalg.norm(tail, axis=1, keepdims=True)
    wet = signal.fftconvolve(x[None], tail, axes=1)[:, :N]
    return irfft(rfft(wet) * amp(read(ROOM_DB, HZ)), N)


# phase by which the left port leads: f/Hz, lead/rad
LEAD = [(0, 0), (560, -.7), (780, 0), (1650, 0), (2800, 2.3), (3600, 1.2), (5100, 1.3), (6000, 3.14),
        (8000, 6.2), (10300, 9.42), (12600, 12.5), (14900, 15.7), (16500, 16.3)]
# how alike the ports hear diffuse sound: f/Hz, likeness (0 to 1)
LIKENESS = [(60, .95), (380, .86), (520, .66), (720, .5), (1700, .88), (2700, .64), (4400, .52),
            (5750, .995), (6200, .995), (7000, .82), (8000, .94), (9000, .82), (10000, .995), (10600, .995),
            (11400, .84), (13600, .85), (15000, .99)]
# left minus right: f/Hz, level/dB
TILT = [(60, -1), (150, -1), (500, -4.5), (1100, -2.5), (1700, 0.5), (3000, -2), (5000, -1.5), (6500, 2),
        (15000, -1.5)]


def ports(direct, diffuse):
    """Direct sound reaches both ports alike, diffuse sound only partly; they differ in phase and level."""
    same = np.clip(read(LIKENESS, HZ), 0, .998)
    common = rfft(direct) + rfft(diffuse[0]) * np.sqrt((1 + same) / 2)
    apart = rfft(diffuse[1]) * np.sqrt((1 - same) / 2)
    lean = amp(read(TILT, HZ) / 2)
    lag = np.exp(-1j * np.interp(HZ, *np.transpose(LEAD)))
    left, right = (common + apart) * lean, (common - apart) / lean * lag
    return irfft(np.array([left, right]), N)


def scene():
    """Blows, pops and grating steel with their room, over the rubbing and the still air."""
    rubbing, popping = shoves(), pops()
    for source in (fingers, binder_drag, bar_scrape, sleeves):
        friction, dents = source()
        rubbing += friction
        popping += dents
    grating = cover_catches() + bar_grate() + lever_judder() + lever_rattle()
    hits = knocks() + clinks() + bar_taps() + bar_drops() + steel_snaps()
    direct, scattered = hits + bumps()
    reflected = room(scattered + amp(-4.5) * popping + grating)
    diffuse = reflected + rubbing + hum() + still_air()
    return ports(direct + popping + grating, diffuse)


EDGE_HZ = 15900


def record(dry):
    """The recorder's low cut, its soft ceiling and its band limit."""
    cut = signal.sosfilt(signal.butter(3, 42, "high", fs=SR, output="sos"), dry)
    held = .85 * np.tanh(cut / .85)
    limit = signal.firwin(401, EDGE_HZ, window=("kaiser", 9), fs=SR)
    return signal.oaconvolve(held, limit[None], "same")


dry = scene()
out = record(dry)
master_out(out)
```